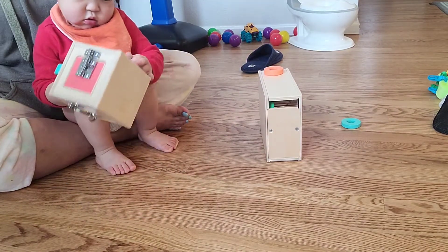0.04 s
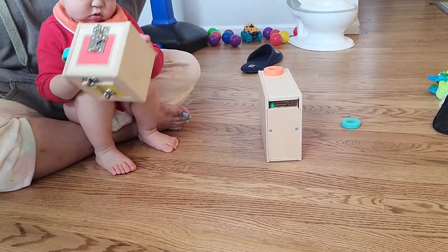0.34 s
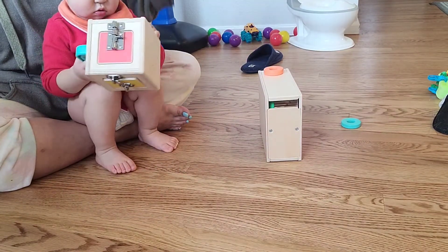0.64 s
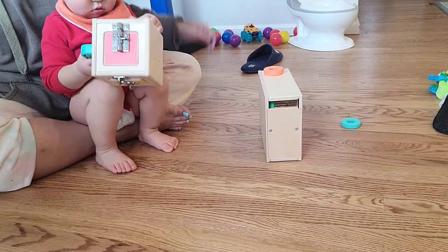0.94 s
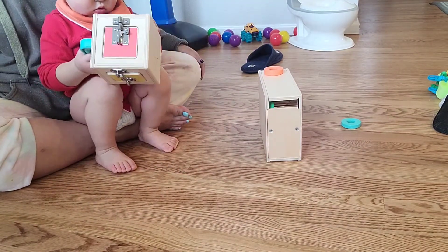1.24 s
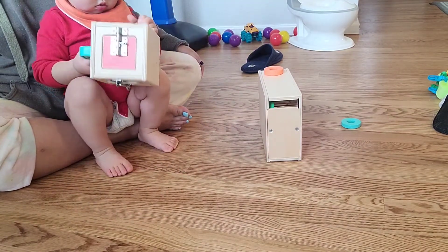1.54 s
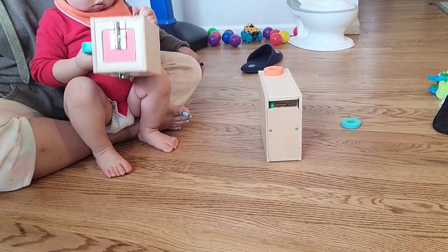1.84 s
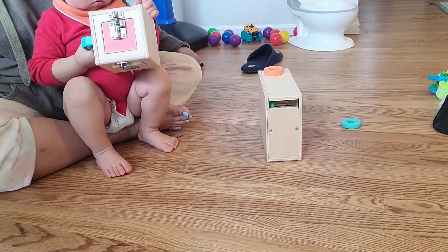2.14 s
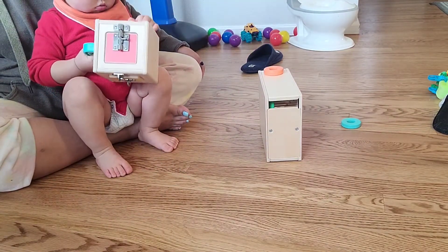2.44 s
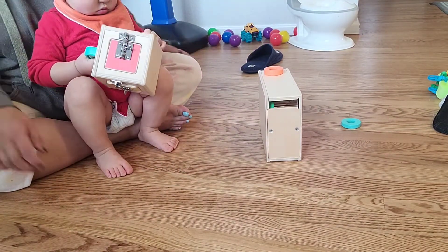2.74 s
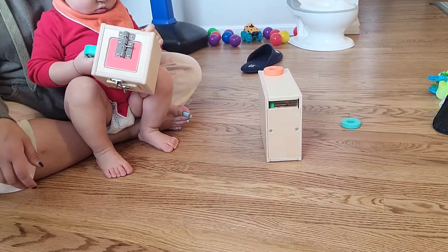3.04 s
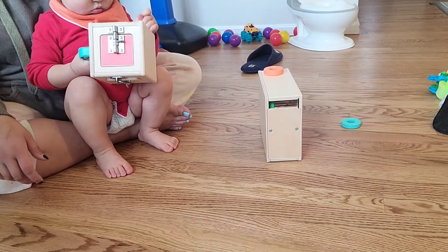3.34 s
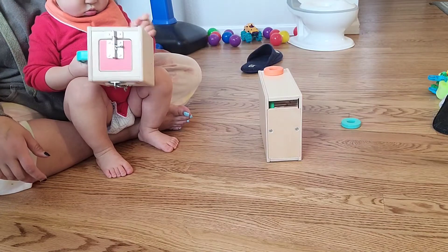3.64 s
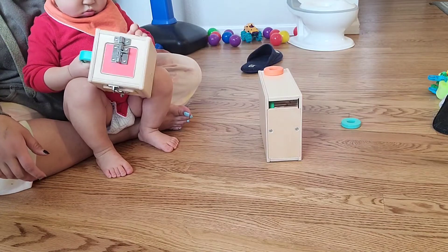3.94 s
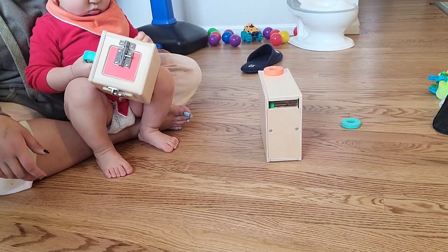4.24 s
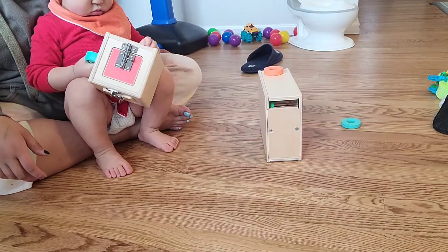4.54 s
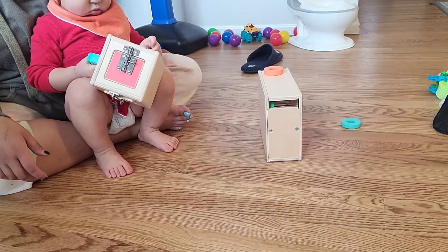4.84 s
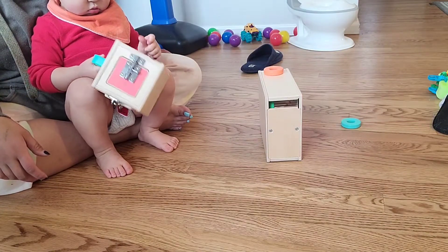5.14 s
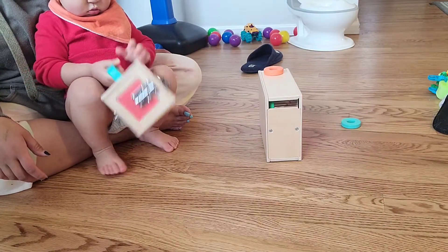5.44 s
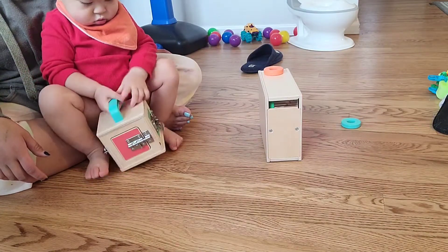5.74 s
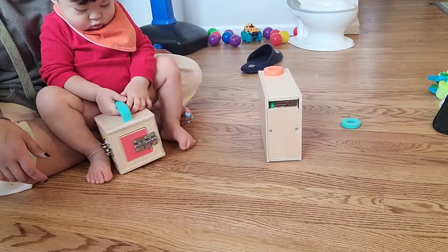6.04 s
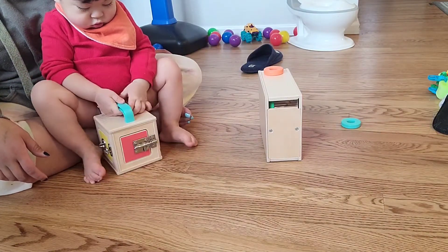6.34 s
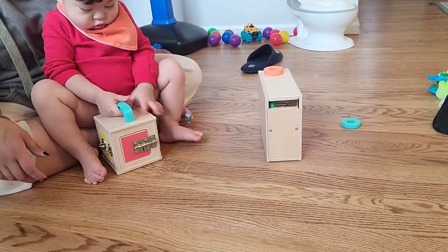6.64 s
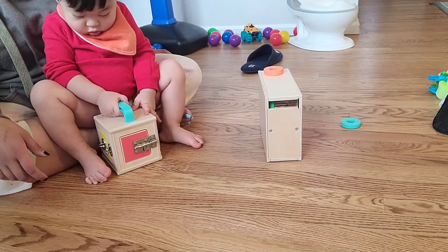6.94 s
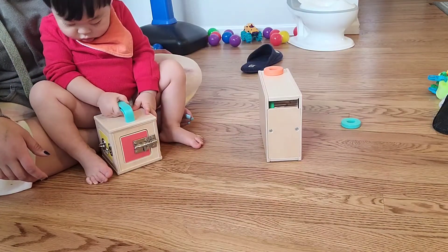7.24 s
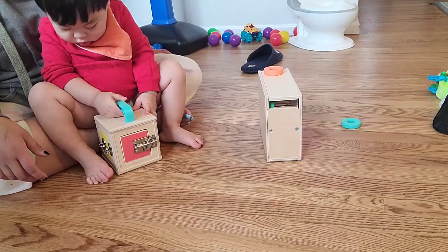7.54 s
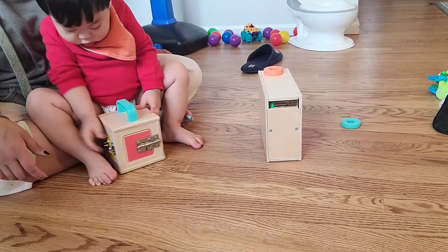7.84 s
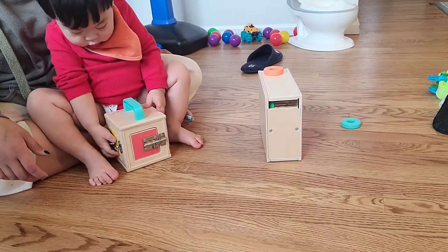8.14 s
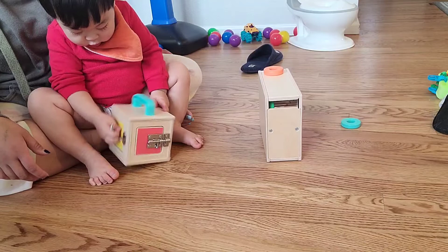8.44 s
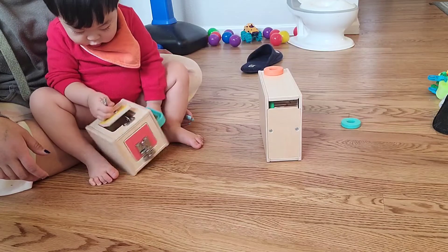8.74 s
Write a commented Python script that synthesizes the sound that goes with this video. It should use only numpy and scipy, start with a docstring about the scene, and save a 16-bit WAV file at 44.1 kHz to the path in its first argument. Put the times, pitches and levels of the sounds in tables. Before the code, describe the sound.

A wooden toy box is handled in a quiet room, with light hollow knocks and scattered bright clicks and rattles from its steel latches. Past the middle it slides down and thumps onto a hardwood floor, then is softly bumped and dragged. Near the end a sprung latch pings, a little door pops open and a brief clatter follows. The sound is fairly close, with a short room echo over a faint rumble.

```python
"""A small child plays with a wooden latch box in a room with a hardwood floor.
First its little doors knock and its steel latches click and jingle, with a few deep, distant booms.
Near 5.7 s the box slides off the knees and thumps onto the boards, then it is bumped and dragged about.
Just after 8.2 s a sprung latch snaps, a door pops open and a last clatter follows.
Each hit rings the modes of wood or steel, and the room answers briefly over a faint rumble."""
import sys
import numpy as np
from scipy import signal
from scipy.fft import rfft, irfft, next_fast_len
from scipy.io import wavfile

SR = 44100
rng = np.random.default_rng(int(sys.argv[2]) if len(sys.argv) > 2 else 0)


def inscribe(sig):
    """Save sig as 16-bit PCM at rate SR to the path in sys.argv[1].

    A 1-D sig is mono; a 2-D sig holds one channel per row.
    Samples are clipped to [-1, 1] before scaling.
    """
    pcm = np.round(np.clip(np.atleast_2d(sig).T, -1, 1) * 32767)
    wavfile.write(sys.argv[1], SR, pcm.astype(np.int16))


N = 392049

# Cue levels are pre-fader: each source sets its own direct and room gain.
# wooden knocks and thumps, with a few deep, distant booms in the room;
# each has its own depth and brightness, from dull thud to sharp crack:
# (time [s], level [dB], low cut [Hz], high cut [Hz], room send [dB])
KNOCK_CUES = [(0.9205, -44, 660, 1700, 0.5), (1.438, -40.5, 180, 1670, -8), (1.444, -48, 84, 550, 13.5),
              (1.468, -57, 76, 1280, 0), (2.189, -47, 660, 2600, 2.5), (2.667, -38, 280, 9200, -14),
              (2.674, -46, 90, 1510, 13.5), (2.711, -50, 75, 600, -2), (2.792, -48, 85, 1300, 1.5),
              (5.61, -46, 65, 130, -5), (5.7355, -19.5, 200, 305, -5.5), (5.7445, -29, 87, 280, -22),
              (5.778, -47.5, 200, 206, 15.5), (5.789, -40, 70, 80, 6), (5.844, -33.5, 83, 1340, -13.5),
              (5.849, -42.5, 101, 3540, 2), (5.89, -48, 130, 700, -18), (6.188, -44.5, 70, 135, 5),
              (6.218, -45.5, 191, 261, -5.5), (8.228, -49, 460, 2610, 1), (8.246, -48.5, 435, 790, 2.5),
              (8.555, -42.5, 300, 1600, 3), (8.612, -33, 189, 696, -16), (8.622, -64, 200, 500, -12)]
# soft bumps of hands on the box: (time [s], level [dB])
BUMP_CUES = [(3.2975, -51), (6.924, -46.5), (7.094, -52), (7.462, -50.5), (7.576, -51), (7.673, -49.5),
             (7.883, -40), (8.16, -40), (8.843, -46)]
# latches hitting their stops: (time [s], level [dB], low cut [Hz], high cut [Hz], room send [dB])
CLICK_CUES = [(0.536, -62, 4300, 5470, -7.5), (0.927, -43, 5460, 7400, -6.5),
              (2.067, -44.5, 2960, 8900, -11.5), (2.121, -59, 2760, 7460, -1), (2.228, -53, 4460, 9800, 1),
              (2.2645, -46.5, 2310, 8900, -10.5), (2.763, -59, 7900, 11000, 5),
              (2.866, -48, 2800, 5100, -5.5), (3.14, -62, 790, 2470, -2), (3.257, -57.5, 1600, 3930, -2.5),
              (3.2995, -42.5, 4100, 9500, -6), (3.6889, -43, 1590, 11000, -10.5),
              (3.71, -47.5, 921, 11000, -4), (4.383, -54, 1900, 2000, -7.5),
              (4.4144, -51.5, 1860, 4060, -4), (4.461, -49.5, 1700, 2390, -15),
              (4.666, -46.5, 1500, 5900, -2.5), (4.6754, -33, 1840, 8300, -14.5),
              (4.9899, -42.5, 1900, 2870, -10.5), (5.0361, -52, 1900, 2460, -3.5),
              (5.1104, -51.5, 1900, 3500, -2), (5.216, -59.5, 3960, 4960, -8.5),
              (5.4527, -49, 2770, 5000, 1), (5.461, -44.5, 4500, 6450, -7), (5.517, -46, 3000, 6500, -3),
              (5.5303, -43.5, 2560, 4500, -7), (5.5666, -40.5, 1250, 5500, -10),
              (5.993, -62, 1500, 6000, -18), (6.085, -71, 4500, 4680, -3), (6.221, -53, 2470, 3000, -12.5),
              (6.304, -60.5, 1800, 4050, -13.5), (8.228, -46, 5730, 12900, -3),
              (8.5892, -37.5, 800, 6880, -5.5), (8.594, -39.5, 2640, 5000, 1),
              (8.6084, -33.5, 825, 4600, -17), (8.7414, -48, 2700, 3250, -2.5),
              (8.877, -61.5, 3000, 3300, -12)]
# loose latches shaken: (peak time [s], rise [s], fall [s], level [dB], tilt [dB/octave])
RATTLE_CUES = [(2.88, 0.18, 0.054, -61, 0.5), (4.31, 0.016, 0.016, -71.5, -4),
               (4.77, 0.028, 0.026, -60.5, -2.5), (5.125, 0.035, 0.021, -57.5, 0),
               (5.565, 0.092, 0.072, -49.5, -3), (5.745, 0.043, 0.057, -49, -1),
               (6.22, 0.057, 0.022, -66, -2), (7.22, .08, 0.055, -83, 2), (7.89, 0.036, 0.02, -76.5, 2),
               (8.602, 0.036, 0.019, -45, 1)]
# square hits on one resonance of a door or latch: (time [s], pitch [Hz], level [dB])
CLACK_CUES = [(0.9195, 3300, -50), (1.175, 1364, -70), (2.067, 2980, -51), (2.189, 488, -53),
              (2.189, 925, -50.5), (2.666, 2840, -35.5), (3.6893, 3120, -49.5), (4.6754, 3800, -50),
              (0.9195, 2010, -54), (3.257, 2340, -58), (3.2995, 2360, -53.5), (3.6893, 1723, -50),
              (4.6754, 1780, -45), (4.9902, 2343, -53), (5.844, 548, -41.5), (7.885, 653, -47.5),
              (8.159, 601, -53.5), (7.805, 3020, -63), (8.7416, 3340, -55)]
# the sprung latch set ringing: (time [s], level [dB])
PING_CUES = [(3.2995, -48), (3.71, -45), (8.228, -33), (8.271, -48), (8.601, -31)]
# the tight door popping free: (time [s], level [dB])
POP_CUES = [(8.2882, -25.5), (8.293, -35.5), (8.304, -48)]
# rubs on knees, hands and boards: (peak time [s], rise [s], fall [s], level [dB], tilt [dB/octave])
DRAG_CUES = [(0.5, .25, 0.17, -80, 2.5), (5.58, 0.061, 0.48, -54.5, 3), (6.002, 0.19, 0.85, -68, -3),
             (7.299, 0.23, 0.17, -67, -1.5), (7.899, 0.16, 0.11, -51, -1.5), (8.509, 0.077, 0.14, -41, 0.5),
             (8.72, 0.24, 0.23, -48.5, -4)]

# modes of the box on the boards, a latch, the spring and the door: (pitch [Hz], level [dB], t60 [s])
BOX_MODES = [(70.6, 5.5, 0.085), (163.8, 3, 0.12), (209, -6, 0.083), (240.7, -3.5, 0.16), (287, 5, 0.053),
             (375.3, 1.5, 0.032), (492.6, 8, 0.049), (583.7, -1, 0.069), (630, 2, 0.044), (762, 5, 0.014),
             (825, -17.5, 0.047), (1349, -2.5, 0.019), (1785, 11.5, 0.0072), (2464, -1.5, 0.012),
             (2973, -2, 0.013), (2900, -6, 0.0086), (4120, -17.5, 0.013)]
LATCH_MODES = [(563.5, 2.5, 0.053), (772, -4.5, 0.11), (1663, 1.5, 0.026), (1961, 2, 0.021),
               (2223, 3, 0.017), (2620, -1.5, 0.016), (2703, 9.5, 0.0026), (3380, 7.5, 0.011),
               (4890, -8.5, 0.13), (5020, -2.5, 0.033), (7780, -9.5, 0.18), (9040, 10, 0.017),
               (9920, 5, 0.025), (12980, -11, 0.01)]
SPRING_MODES = [(4370, -8, 0.17), (5250, 13, 0.045), (5720, 0, 0.029), (6050, 4, 0.05), (7280, -13, 0.27),
                (9140, -2, 0.069), (11720, -5, .055)]
DOOR_MODES = [(740, -7, 0.043), (991, 1.5, 0.034), (1520, -10, 0.017), (1800, -8, 0.0061),
              (2800, -21, 0.011)]
# band splits for knocks, latches and drags: (edge [Hz])
KNOCK_BANDS = [45, 120, 380, 1120, 3600, 7000, 16000]
LATCH_BANDS = [450, 1450, 2500, 4300, 7500, 15000]
DRAG_BANDS = [140, 380, 1150, 4600]
# tone of an average rattle and an average rub: (frequency [Hz], band level [dB])
RATTLE_EQ = [(800, -12), (1900, 0), (3300, 1), (5700, 3), (10600, 1)]
DRAG_EQ = [(230, 2.5), (660, 1.5), (2600, -4.5)]
# decay of the room: (frequency [Hz], t60 [s])
ROOM_DECAY = [(60, .5), (250, 0.48), (1000, 0.5353), (3000, 0.4842), (8000, 0.4), (16000, 0.21)]
# strength of the room's echoes: (frequency [Hz], return gain [dB])
ROOM_EQ = [(60, -4), (200, -3), (600, -2.5), (2000, 0.5), (6000, -4.5), (16000, 5)]
# house rumble and hiss: (frequency [Hz], relative spectral density [dB])
ROOM_TONE_EQ = [(12, -35.5), (20, -1.5), (41, 0), (81, -4.5), (134, -22), (310, -17), (422, -22.5),
                (472, -27), (624, -23.5), (1260, -29), (1400, -28), (1570, -29), (1810, -31.5), (6540, -44),
                (16000, -41)]

RING_TIME = np.arange(SR // 7, dtype=np.float32) / SR  # time axis of one hit [s]
ATTACK_SAMPLES = int(.018 * SR)


def knocks(direct_db=-3.0, room_db=2.0):
    """Hollow wood rings in knocks, bumps and the box's landing; deep hits heavy on room boom far off."""
    # the low and high cuts overlap on the bumps, leaving a dull thud
    cues = KNOCK_CUES + [(s, db, 400, 240, -0.5) for s, db in BUMP_CUES]
    rings = body(BOX_MODES, len(cues), crack_db=7.8, crack_t60=0.012, dense_db=2.6, dense_t60=0.0376)
    hits = strikes(rings, cues, KNOCK_BANDS, cuts_db_per_octave=(16.5, 7.5))
    return hits * faders(direct_db, room_db)


def clicks(direct_db=-7.0, room_db=1.0):
    """Steel latches tap their stops: very short and bright."""
    rings = body(LATCH_MODES, len(CLICK_CUES), crack_db=22, crack_t60=.008, dense_db=1, dense_t60=.045)
    hits = strikes(rings, CLICK_CUES, LATCH_BANDS, cuts_db_per_octave=(17, 7))
    return hits * faders(direct_db, room_db)


def rattles(direct_db=0.0, room_db=-4):
    """Loose latches chatter in their play when the box is jolted."""
    rings = body(LATCH_MODES, 16, crack_db=22, crack_t60=0.013, dense_db=2.7, dense_t60=0.048)
    chatter = jolts(rings, per_s=220, uneven_db=4)
    shakes = swells(chatter, RATTLE_CUES, LATCH_BANDS, RATTLE_EQ, pivot_hz=3170)
    return shakes * faders(direct_db, room_db)


def clacks(t60_cycles=86.0, direct_db=0.5, room_db=-10.0):
    """One mode of a door or latch rings for a set number of cycles, so high notes are the shortest."""
    out = np.zeros(N)
    for s, hz, db in CLACK_CUES:
        fade = undb(-60 * hz * RING_TIME / t60_cycles)
        add(out, s, set_attack(np.sin(2 * np.pi * hz * RING_TIME) * fade, db))
    return out * faders(direct_db, room_db)


def spring_pings(direct_db=-6.0, room_db=-12.0):
    """The latch spring clinks with a few high, steely modes."""
    out = np.zeros(N)
    for (s, db), ring in zip(PING_CUES, modes(SPRING_MODES, len(PING_CUES), scatter_db=0.43)):
        add(out, s, set_attack(ring, db))
    return out * faders(direct_db, room_db)


def door_pop(direct_db=-6.0, room_db=-12.0):
    """The tight door lets go with a hollow pop and rebounds."""
    out = np.zeros(N)
    rings = body(DOOR_MODES, len(POP_CUES), crack_db=-2, crack_t60=0.038, dense_db=-5.0, dense_t60=0.06)
    for (s, db), ring in zip(POP_CUES, rings):
        add(out, s, set_attack(band(ring, 370, 1940, order=2), db))
    return out * faders(direct_db, room_db)


def drags(direct_db=-8.5, room_db=-6.5):
    """Wood catches and slips, ringing the box; a faint rub stays, as the hands never lie quite still."""
    rings = body(BOX_MODES, 24, crack_db=11.5, crack_t60=0.04, dense_db=0, dense_t60=0.045)
    friction = jolts(rings, per_s=260, uneven_db=3.5)
    rubs = swells(friction, DRAG_CUES, DRAG_BANDS, DRAG_EQ, pivot_hz=702, rest_db=-82, rest_tilt=3)
    return rubs * faders(direct_db, room_db)


def modes(table, count, scatter_db, detune=0):
    """One ring of decaying modes per hit; the contact point reweights and detunes high modes most."""
    out = 0
    for k, (hz, db, t60) in enumerate(table):
        level_draw, pitch_draw = rng.standard_normal((2, count, 1))
        note = hz * (1 + detune * min(hz / 4000, 1) * pitch_draw)
        gain = (-1) ** k * undb(db + scatter_db * min(hz / 1000, 1) * level_draw)
        out = out + gain * undb(-60 * RING_TIME / t60) * np.sin(2 * np.pi * note * RING_TIME)
    return out


def body(table, count, crack_db, crack_t60, dense_db, dense_t60):
    """Struck body: the main modes, plus noise for the contact crack and the crowd of small modes."""
    tone = modes(table, count, scatter_db=8.55, detune=0.033)
    crack = undb(crack_db - 60 * RING_TIME / crack_t60)
    dense = undb(dense_db - 60 * RING_TIME / dense_t60)
    return tone + (crack + dense) * rng.standard_normal((count, len(RING_TIME)))


def strikes(rings, cues, edges, cuts_db_per_octave):
    """Each hit drives the bands between its cuts evenly, those outside less; rows: direct, room send."""
    times, level, low_cut, high_cut, send_db = np.transpose(cues)
    hits, out = 0, np.zeros((2, N))
    for lo, hi in zip(edges, edges[1:]):
        centre = np.sqrt(lo * hi)
        octaves_outside = np.maximum(np.log2([low_cut / centre, centre / high_cut]), 0)
        band_db = level - np.dot(cuts_db_per_octave, octaves_outside)
        ringing = band(rings, lo, hi, order=2 if hi < 400 else 4)  # gentle filters keep the bass punchy
        hits = hits + set_attack(ringing, band_db[:, None])
    for s, db, hit in zip(times, send_db, hits):
        add(out, s, np.outer([1, undb(db)], hit))
    return out


def jolts(rings, per_s, uneven_db):
    """A steady stream of uneven little hits, each at a random point of contact."""
    out = np.zeros(N)
    for when, size, way, point in rng.random((int(per_s * N / SR), 4)):
        force = undb(uneven_db * min(-np.log(1 - size), np.pi)) * np.sign(way - .5)
        add(out, when * N / SR, force * rings[int(point * len(rings))])
    return out


def swells(texture, cues, edges, eq, pivot_hz, rest_db=-np.inf, rest_tilt=0):
    """Each move fades the texture up from its resting level and back, tilting the EQ about the pivot."""
    t, out = np.arange(N) / SR, np.zeros(N)
    for lo, hi in zip(edges, edges[1:]):
        centre = np.sqrt(lo * hi)
        octaves = np.log2(centre / pivot_hz)
        gain = undb(rest_db + rest_tilt * octaves)
        for s, rise, fall, level, tilt in cues:
            width = np.where(t < s, rise, fall)
            gain = gain + undb(level + tilt * octaves) * np.exp(-((t - s) / width) ** 2)
        layer = band(texture, lo, hi, order=2)
        out += undb(curve_at(centre, eq)) * gain * layer / layer.std()
    return out


def undb(db):
    """Decibels to gain."""
    return np.exp(np.asarray(db, float) * np.log(10) / 20)


def faders(direct_db, room_db):
    """Gains for a source's two rows: direct sound and room send."""
    return undb([[direct_db], [room_db]])


def curve_at(hz, points):
    """Read a (frequency, value) curve on a log-frequency axis."""
    freqs, values = np.transpose(points)
    return np.interp(np.log(np.maximum(hz, 1)), np.log(freqs), values)


def band(x, lo, hi, order=4):
    """Causal band-pass."""
    return signal.sosfilt(signal.butter(order, [lo, hi], "band", fs=SR, output="sos"), x + 1e-18)


def set_attack(x, db):
    """Scale each ring so that its attack has this rms level."""
    return x * undb(db) / np.sqrt(np.mean(x[..., :ATTACK_SAMPLES] ** 2, -1, keepdims=True))


def add(track, s, x):
    """Mix x into the track from time s on."""
    i = int(s * SR)
    track[..., i:i + x.shape[-1]] += x[..., :N - i]


def room(send, build_s=0.0047, early_db=4, early_s=0.035, wide_above_hz=750):
    """Dense echoes bloom within milliseconds and die away, centred in the bass and wide in the treble."""
    t = np.arange(24576) / SR
    hz, impulse = np.fft.rfftfreq(len(t), 1 / SR), 0
    mid, side = rfft(rng.standard_normal((2, len(t))))
    width = hz / np.hypot(hz, wide_above_hz)
    spectrum = (mid + np.outer([1, -1], width * side)) / np.sqrt(1 + width ** 2)
    bloom = (1 - np.exp(-(t / build_s) ** 2)) * (1 + undb(early_db) * np.exp(-t / early_s))
    centres = np.geomspace(60, 16000, 7)
    for centre, solo in zip(centres, np.eye(len(centres))):
        echoes = irfft(spectrum * curve_at(hz, np.c_[centres, solo]), len(t))
        fade = bloom * undb(-60 * t / curve_at(centre, ROOM_DECAY))
        impulse = impulse + echoes * fade / np.linalg.norm(fade) * undb(curve_at(centre, ROOM_EQ))
    return signal.oaconvolve(send[None], impulse, axes=1)[:, :N]


def room_tone(level_db=-66, wide_above_hz=900):
    """A steady bed of house rumble under a thin hiss."""
    size = next_fast_len(N, True)
    hz = np.fft.rfftfreq(size, 1 / SR)
    mid, side = rfft(rng.standard_normal((2, size))) * undb(curve_at(hz, ROOM_TONE_EQ))
    width = (hz + 80) / (hz + wide_above_hz)
    bed = irfft(mid + np.outer([1, -1], side * width), size)[:, :N]
    return bed * undb(level_db) / bed.mean(0).std()


def scene(left_lag_samples=3, bounce_db=-5.5, bounce_s=0.0013):
    """The stereo mix: the box arrives a touch earlier on the right and sounds brighter on the left."""
    direct, send = knocks() + clicks() + rattles() + clacks() + spring_pings() + door_pop() + drags()
    treble = 0.39 * band(direct, 1800, 13350, order=1)
    left = np.pad(direct + treble, (left_lag_samples, 0))[:N]
    right = direct - treble
    # the bounce off the boards comes just after, in opposite polarity on the two sides
    bounce = undb(bounce_db) * band(direct, 700, 14000, order=1)
    bounce = np.pad(bounce, (int(bounce_s * SR), 0))[:N]
    return np.array([left + bounce, right - bounce]) + room(send) + room_tone()


def record(dry, soften_hz=13000, top_hz=16050):
    """The microphones soften the treble and a steep low-pass cuts the top."""
    soft = signal.sosfilt(signal.butter(1, soften_hz, fs=SR, output="sos"), dry)
    return signal.sosfilt(signal.ellip(10, .2, 70, top_hz, fs=SR, output="sos"), soft)


dry = scene()
out = record(dry)
inscribe(out)
```